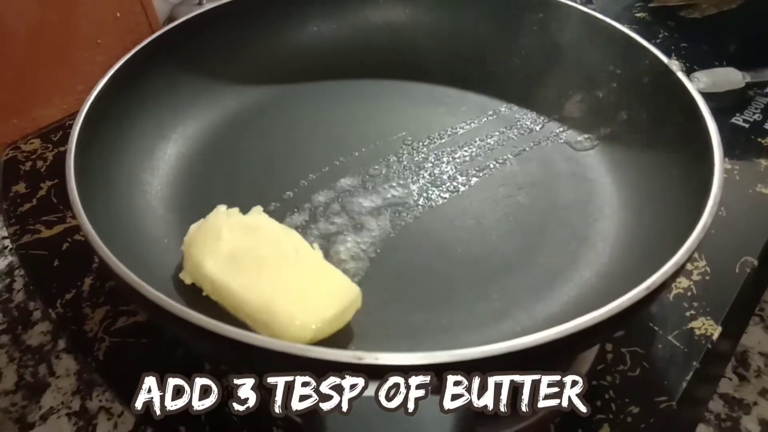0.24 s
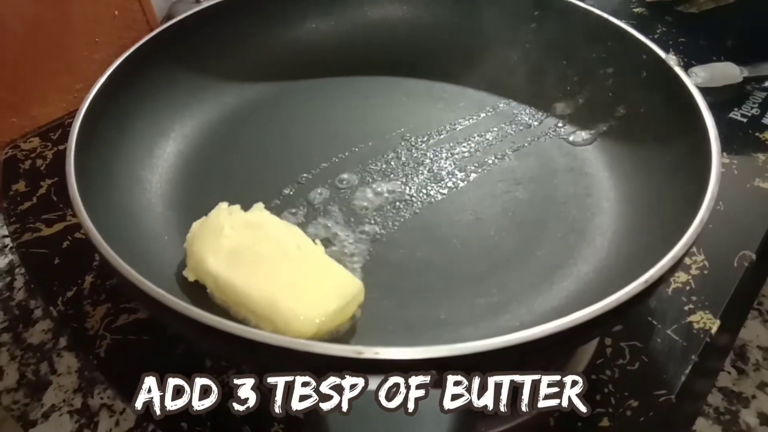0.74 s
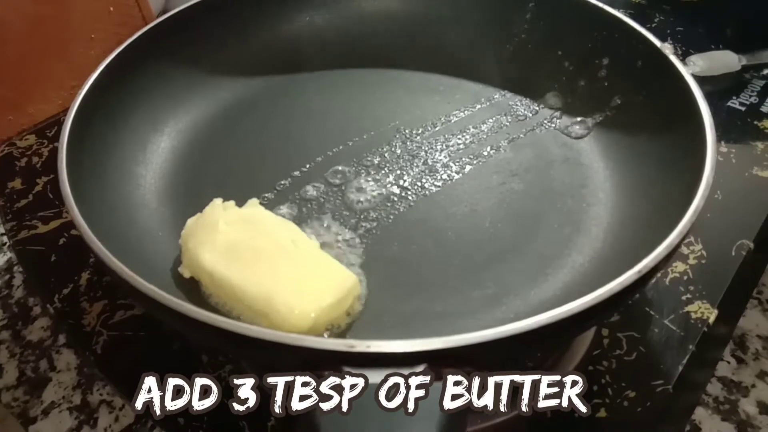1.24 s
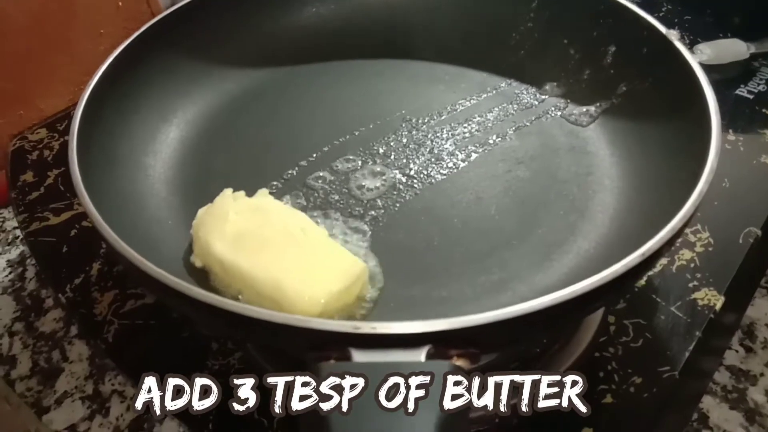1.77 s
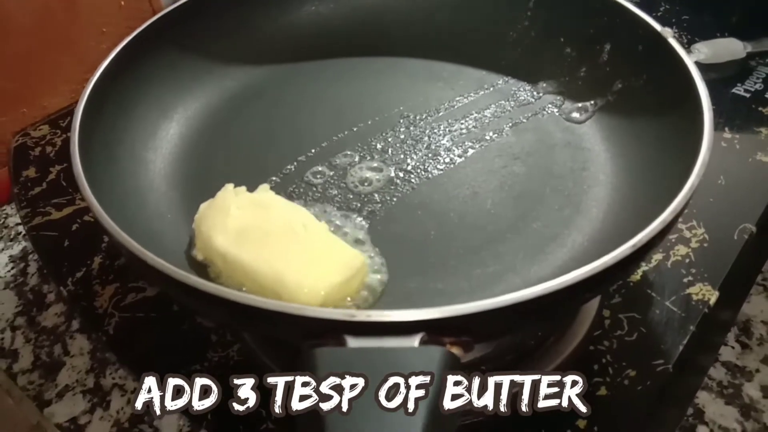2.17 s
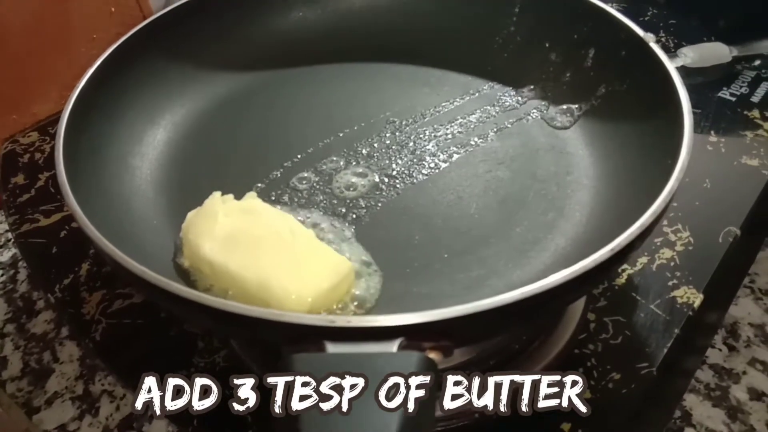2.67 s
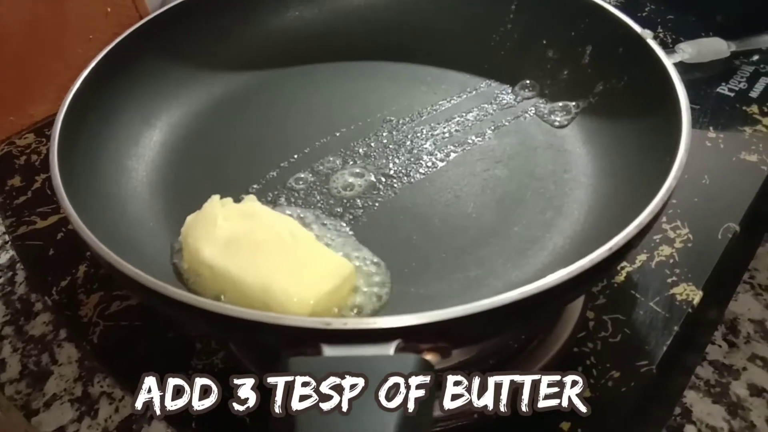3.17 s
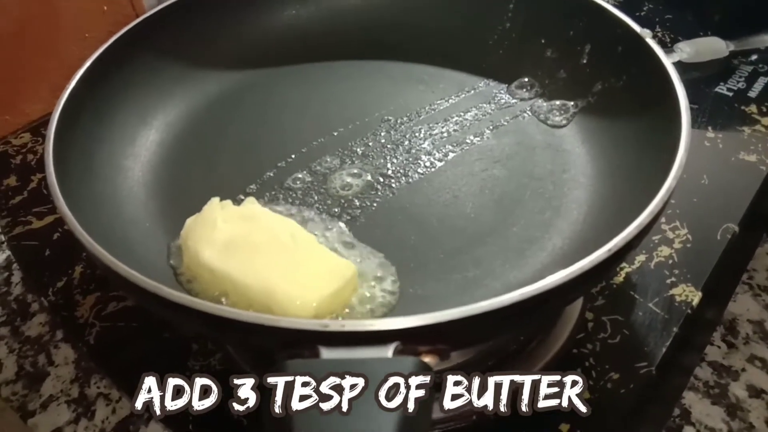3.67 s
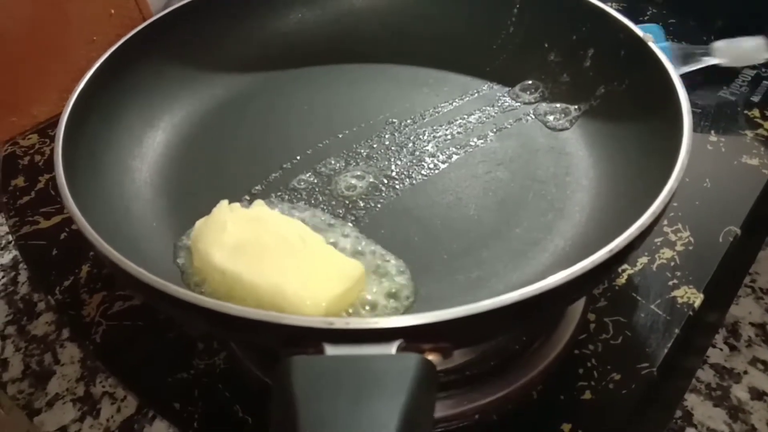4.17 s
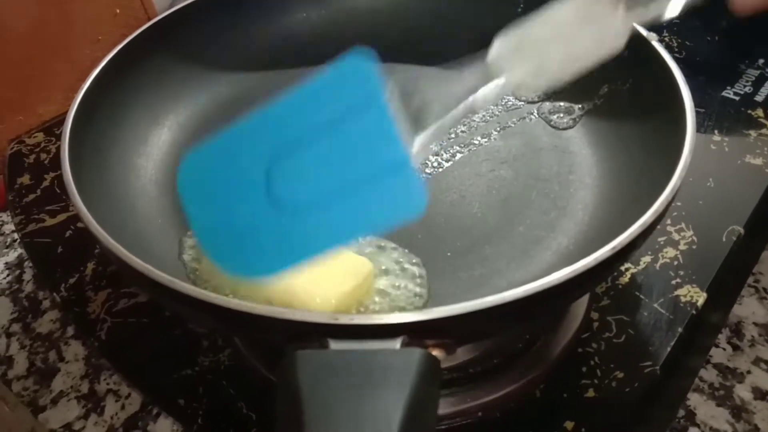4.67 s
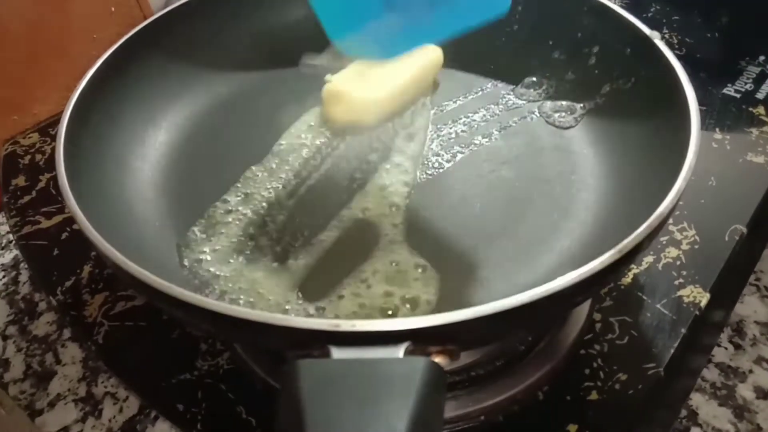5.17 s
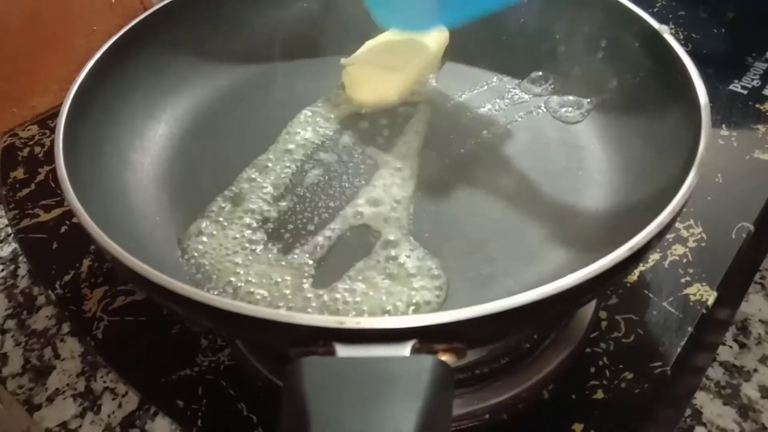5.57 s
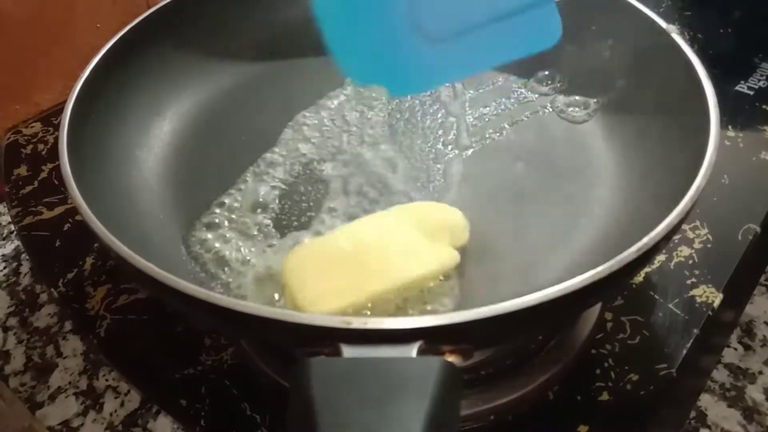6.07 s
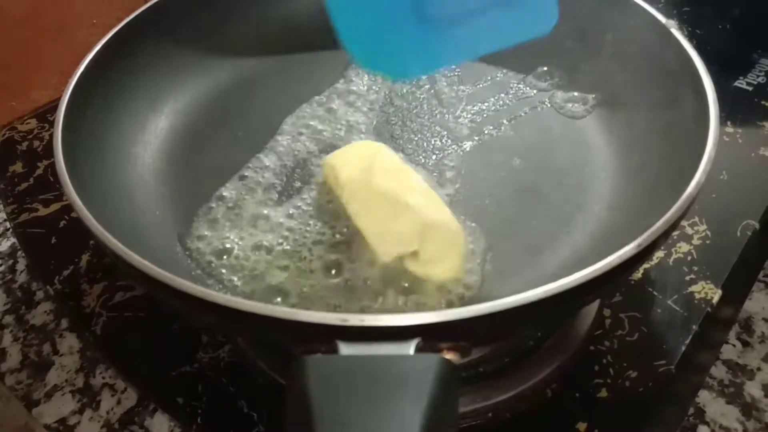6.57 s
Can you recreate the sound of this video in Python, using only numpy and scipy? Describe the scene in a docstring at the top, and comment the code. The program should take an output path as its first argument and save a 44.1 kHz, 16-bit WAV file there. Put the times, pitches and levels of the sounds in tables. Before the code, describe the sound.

Heard close up and in mono in a small kitchen, butter foams in a hot pan: a high hiss of countless tiny bursting bubbles, dotted with sharp pops and little squirts of steam. It flutters at first, then steadies. About two thirds through, a rubber spatula moves the butter and the frying surges and stays louder to the end. The pan rings faintly, and dull bumps and a gas flame sit far below.

```python
"""A bright, crackling sizzle: a knob of butter melts in a hot pan in a small kitchen, close, in mono.
Thousands of tiny steam bubbles burst each second and keep the pan ringing faintly. Single drops spit,
blisters squirt and steam spurts from under the knob. Near 4.8 s a soft spatula pushes the butter over
fresh hot metal and the sizzle grows louder, denser and fuller. Below it, dull bumps and a gas ring."""
import sys
import numpy as np
from scipy import signal
from scipy.fft import rfft, irfft
from scipy.io import wavfile
from scipy.ndimage import uniform_filter1d

SR = 44100
rng = np.random.default_rng(int(sys.argv[2]) if len(sys.argv) > 2 else 0)


def bounce(signal):
    """Save signal as a 16-bit WAV file at the path given by the first command-line argument."""
    frames = np.transpose(np.atleast_2d(signal))
    limited = np.clip(frames, -1, 1)
    pcm = np.round(limited * 32767).astype(np.int16)
    wavfile.write(sys.argv[1], SR, pcm)


N = 301203
TIME_S = np.arange(N) / SR
SIMMER_DB = -28   # frying level at zero vigour

# Loudest spitting drops. Each row: start in seconds, dry peak in dB.
LOUD_SPITS = [(0.2733, -14), (0.4509, -12), (0.5207, -12), (0.595, -13), (1.1802, -12), (1.2396, -11),
              (1.289, -13), (1.3658, -12), (1.7335, -13), (2.0672, -11), (2.9267, -13), (3.2226, -11),
              (3.8636, -9), (4.1904, -9), (4.8244, -11), (5.2969, -8), (5.7608, -8), (6.2377, -9)]
# Modes of the pan. Each row: frequency in Hz, bandwidth in Hz, relative gain in dB.
PAN_MODES = [(580, 47, -18), (824, 34, -6.5), (1263.5, 48, 4), (1714, 30, 0.5), (1917, 16, -1),
             (2148, 140, 3), (2500, 20, 0.5), (2885, 50, 8.5), (3190, 87, 7), (3750, 75, 4)]


def bubble_bursts(clump_db=1.5, clumps_per_s=35, ring_width_hz=350, tear_s=0.0086, fizz_s=0.047):
    """Bubbles burst in clumps; each snaps, rings at its own pitch, tears and fizzes out. Even level."""
    # Spreading foam. Each row: time in seconds, nominal bursts per second, size spread in dB.
    foam = [(0, 2560, 0), (1.3, 3600, 1), (2.4, 4600, 2), (4.7, 4700, 0), (5.0, 8000, 0.5),
            (6.83, 12200, 0.5)]
    per_s, spread_db = curves(foam)
    born = rng.random(N) < per_s * from_db(clump_db * drift(clumps_per_s)) / SR
    impulses = born * rng.choice([-1, 1], N)
    clicks = impulses * from_db(spread_db * np.minimum(rng.exponential(1, N), 5.9))
    pitches_hz = np.linspace(1000, 12000, 28)
    pitch_index = rng.integers(0, len(pitches_hz), N)
    rings = sum(resonate(clicks * (pitch_index == k), hz, ring_width_hz) * rng.choice([-1, 1])
                for k, hz in enumerate(pitches_hz))
    snaps = from_db(-3) * rms_one(clicks) * rng.choice([-1, 1], N)
    tears = from_db(-5) * fizz(clicks, tear_s)
    crackle = rms_one(rings) + snaps + tears + from_db(-6) * fizz(clicks, fizz_s)
    return crackle / np.sqrt(uniform_filter1d(crackle ** 2, size=SR // 12) + 1e-12)


def fizz(clicks, decay_s):
    """Each click leaves a decaying puff of noise."""
    pole = np.exp(-2 / (decay_s * SR))
    power = signal.lfilter([1], [1, -pole], clicks ** 2)
    return rms_one(np.sqrt(power) * rng.standard_normal(N))


def sizzle(crackle, squeeze_lag_s=0.035):
    """Coarse bubbles below the main hiss, fine spray above it; all three follow the vigour."""
    # Lean of the hiss. Each row: time in seconds, boost above and cut below 7 kHz in dB.
    lean = [(0, 3), (0.7, 3), (1.3, 0.5), (2.4, 0), (4.7, -2), (5.0, -1.5), (6.83, 0)]
    lean_db, = curves(lean)
    vigour_db, stutter_db, smother_db = vigour(), stutter(), spatula_pressure(lag_s=0)
    coarse, rest = split(brighten(crackle), hz=4556)
    hiss, spray = split(rest, hz=9000)
    lower, upper = split(hiss, hz=7000)
    hiss = from_db(-lean_db) * lower + from_db(lean_db) * upper
    hiss_db = SIMMER_DB - 1.01 + vigour_db + stutter_db - smother_db
    coarse_db = -47.5 + 1.274 * vigour_db + 0.66 * stutter_db + 1.32 * drift(per_s=30)
    coarse_db += 1.9 * spatula_pressure(squeeze_lag_s)   # a press squeezes out coarse bubbles
    spray_db = -38.5 + 1.21 * vigour_db + 0.39 * stutter_db + flash() - smother_db
    bands = (coarse_db, coarse), (hiss_db, hiss), (spray_db, spray)
    return sum(from_db(db) * rms_one(band) for db, band in bands)


def brighten(x):
    """Tone of a burst: strongest at 6-7 kHz, with the microphone's thin sheen on top."""
    # Both spectra, each row: frequency in Hz, gain in dB.
    burst_spectrum = [(500, -44), (1050, -40.5), (1900, -35), (2300, -25), (3000, -17), (3450, -23),
                      (4200, -20), (5300, -8), (6000, 0.5), (6650, -4.5), (7200, 0.5), (8150, -10.5),
                      (8700, -12), (10000, -22)]
    sheen_spectrum = [(10000, -1), (13850, -1.5), (14650, 13)]
    return colour(colour(x, burst_spectrum), sheen_spectrum)


def vigour():
    """Frying level in dB over a simmer; surges as the butter is pushed over fresh metal."""
    # Each row: time in seconds, frying level in dB.
    frying = [(0, -29.5), (0.5, -28.0), (1.0, -29.5), (1.6, -28.5), (2.25, -27.5), (3.0, -28.0),
              (3.3, -26.5), (4.35, -26.5), (4.68, -26.5), (4.77, -26.5), (4.93, -22), (5.35, -21.5),
              (5.7, -22), (6.0, -21.5), (6.15, -22), (6.5, -22), (6.83, -21)]
    return curves(frying)[0] - SIMMER_DB


def stutter(simmer_flutter_db=0.9, halving_db=8, flurry_db=2.5):
    """Quick swings of the hiss in dB: sparse foam flutters, loud spits set off flurries, lulls dip."""
    flutter_db = simmer_flutter_db * 0.5 ** (vigour() / halving_db) * drift(per_s=40)
    flurries = sum(swell(s, rise_s=0.002, fall_s=0.018) for s, _ in LOUD_SPITS)
    return flutter_db + flurry_db * flurries - lulls()


def lulls():
    """Hiss lost, in dB, as the still thin foam falters."""
    # Each row: centre in seconds, depth in dB.
    dips = [(0.21, 2.5), (0.72, 3), (0.98, 2.5), (1.12, 4.5), (1.27, 6.5), (1.38, 4), (1.71, 2.5),
            (2.04, 1)]
    return sum(db * hump(s, half_s=0.037) for s, db in dips)


def flash():
    """Extra spray in dB: fat meets bare hot metal and flashes until its water boils off."""
    # Each row: crest in seconds, boost in dB, rise and fall in seconds.
    flashes = [(0.2, 6, 0.6, 1), (2.08, 8, 0.016, 0.05), (2.29, 5, 0.031, 0.038), (5.01, 6, 0.17, 0.083),
               (5.86, 4, 0.24, 0.52)]
    return sum(db * swell(s, rise_s, fall_s) for s, db, rise_s, fall_s in flashes)


def spits(tear_s=0.0021, tear_db=-20):
    """A drop bursts with one sharp snap and a brief tearing of its film."""
    drops = list(LOUD_SPITS) + small_spits()
    starts = [int(s * SR) for s, _ in drops]
    t, out = TIME_S[:SR // 100], np.zeros(N)
    tears = rng.standard_normal((len(drops), len(t))) * np.exp(-t / tear_s) * from_db(tear_db)
    for at, tear in zip(starts, tears):
        out[at:at + len(t)] += (t == 0) + tear
    out = brighten(resonate(out, hz=6730, width_hz=1300))   # the drop's cavity rounds the snap
    for at, (_, peak_db) in zip(starts, drops):
        snap = out[at:at + SR // 200]
        snap *= from_db(peak_db) / np.abs(snap).max()
    return out


def small_spits(per_s=6, over_frying_db=11, spread_db=1.5):
    """Lesser drops spit at random, following the frying. Each row: start in seconds, dry peak in dB."""
    starts = np.flatnonzero(rng.random(N - SR // 50) < per_s / SR)
    peak_db = SIMMER_DB + vigour() - lulls() + over_frying_db + spread_db * rng.uniform(-1.2, 1, N)
    return list(zip(starts / SR, peak_db[starts]))


def squirts(width_hz=850, rise_s=0.0041):
    """Steam is forced through the torn skin of a blister, which resonates."""
    # Each row: crest in seconds, level in dB, fall in seconds, centre in Hz.
    blisters = [(0.13, -41, 0.0087, 4200), (0.472, -32, 0.0068, 4780), (0.595, -47, 0.013, 4130),
                (1.06, -47, 0.01, 4960), (1.86, -36, 0.0098, 4870), (3.15, -32, 0.014, 5000),
                (4.06, -34, 0.021, 4800)]
    jet = rng.standard_normal(N)
    return sum(from_db(db) * swell(s, rise_s, fall_s) * steep_band(jet, hz, width_hz)
               for s, db, fall_s, hz in blisters)


def spurts(width_hz=1500, sputter_db=1.5, ring_db=-5, trim_db=-3):
    """Trapped steam escapes in short, dull, sputtering puffs that ring the pan."""
    # Each row: crest in seconds, level before trim in dB, rise and fall in seconds, centre in Hz.
    puffs = [(0.085, -48.5, 0.0096, 0.028, 1500), (0.342, -47, 0.0081, 0.026, 1490),
             (0.752, -44, 0.016, 0.018, 1450), (0.89, -46, 0.0094, 0.008, 1600),
             (1.441, -44, 0.0084, 0.047, 990), (1.683, -39, 0.021, 0.013, 1350),
             (2.072, -38, 0.0052, 0.025, 2320), (2.138, -37.5, 0.018, 0.012, 1590),
             (2.279, -36.5, 0.026, 0.041, 1640), (3.98, -47, 0.012, 0.014, 900)]
    # Each row: frequency in Hz, gain in dB.
    jet_spectrum = [(120, 0), (350, -1.5), (600, 1.5), (1050, -6), (1350, -1), (2000, -4), (2800, 0),
                    (4500, -38), (9000, -78)]
    sputter = rng.standard_normal(N) * from_db(sputter_db * drift(per_s=250))
    jet = rms_one(colour(sputter, jet_spectrum))
    ring = sum(from_db(db) * resonate(jet, hz, mode_width_hz) for hz, mode_width_hz, db in PAN_MODES)
    jet += from_db(ring_db) * rms_one(ring)
    return sum(from_db(db + trim_db) * swell(s, rise_s, fall_s) * rms_one(resonate(jet, hz, width_hz))
               for s, db, rise_s, fall_s, hz in puffs)


def pan_ring(flicker_db=1.9):
    """Bubbles collapsing on the metal keep its modes ringing, more so as the frying grows."""
    level_db = -58.5 + 1.51 * vigour() + flash()
    ring = np.zeros(N)
    for hz, width_hz, db in PAN_MODES:
        gain = from_db(db + flicker_db * drift(per_s=25))
        ring += gain * resonate(rng.standard_normal(N), hz, width_hz)
    return from_db(level_db) * rms_one(ring)


def spatula_rubs(relative_width=0.041):
    """Rubber and butter are soft: each nudge is a dull, narrow murmur of the pan."""
    # Each row: crest in seconds, level in dB, rise and fall in seconds, centre in Hz.
    nudges = [(4.85, -58.5, 0.049, 0.04, 738), (4.94, -48.5, 0.061, 0.045, 1270),
              (5.62, -61, 0.024, .03, 292)]
    rub = rng.standard_normal(N)
    return sum(from_db(db) * swell(s, rise_s, fall_s) * rms_one(resonate(rub, hz, relative_width * hz))
               for s, db, rise_s, fall_s, hz in nudges)


def spatula_pressure(lag_s):
    """How hard the spatula bore down lag_s earlier, in dB of hiss smothered."""
    # Each row: centre in seconds, hiss lost in dB, half length in seconds.
    presses = [(4.772, 3.5, 0.067), (5.63, 1.4, 0.046), (6.164, 1.5, 0.1)]
    return sum(db * hump(s + lag_s, half_s) for s, db, half_s in presses)


def bumps():
    """Brief, soft booms, all on one low resonance."""
    # Each row: crest in seconds, level in dB.
    crests = [(0.71, -64), (0.9, -58), (3.29, -54.5), (5.2, -55), (5.62, -58), (5.91, -54), (6.33, -57.5)]
    boom = steep_band(rng.standard_normal(N), hz=92, width_hz=44)
    return boom * sum(from_db(db) * hump(s, half_s=0.029) for s, db in crests)


def burner(flame_db=-67, waver_db=2, air_db=-70):
    """The gas ring rumbles unevenly over the still air of the kitchen."""
    # Both spectra, each row: frequency in Hz, gain in dB.
    flame_spectrum = [(20, -25), (55, -14), (76, 1.5), (100, 4.5), (135, -10), (205, -5.5), (320, -18.5),
                      (700, -62)]
    air_spectrum = [(20, 13), (60, -10), (180, 7.5), (300, 8), (500, 5), (1000, -15.5), (3000, -52),
                    (12000, -5.5)]
    flame, air = rng.standard_normal((2, N))
    rumble = from_db(flame_db + waver_db * drift(per_s=6.9)) * rms_one(colour(flame, flame_spectrum))
    return rumble + from_db(air_db) * rms_one(colour(air, air_spectrum))


def kitchen(x, wet_db, t60_s=0.19):
    """Adds the room's short diffuse tail."""
    t = TIME_S[:SR // 2]
    tail = rng.standard_normal(len(t)) * from_db(-60 * t / t60_s) * (t > 0.005)
    return x + from_db(wet_db) * signal.fftconvolve(x, tail / np.linalg.norm(tail))[:N]


def from_db(db):
    return 10 ** (np.asarray(db) / 20)


def rms_one(x):
    return x / np.sqrt(np.mean(x ** 2) + 1e-20)


def curves(rows):
    """Each value column of a timed table at every sample."""
    times_s, *columns = np.transpose(rows)
    return [np.interp(TIME_S, times_s, column) for column in columns]


def drift(per_s):
    """Smooth random wander, RMS 1."""
    knots = rng.standard_normal(N // 40)
    return rms_one(np.interp(TIME_S * per_s, np.arange(len(knots)), knots))


def swell(crest_s, rise_s, fall_s):
    """Exponential rise to 1 and decay; rise_s and fall_s are time constants."""
    return np.exp(-np.maximum((crest_s - TIME_S) / rise_s, (TIME_S - crest_s) / fall_s))


def hump(centre_s, half_s):
    """Gaussian envelope, peak 1."""
    return np.exp(-((TIME_S - centre_s) / half_s) ** 2)


def resonate(x, hz, width_hz):
    """Two-pole resonance, peak gain 1."""
    r = np.exp(-np.pi * width_hz / SR)
    feedback = [1, -2 * r * np.cos(2 * np.pi * hz / SR), r * r]
    return signal.lfilter(np.array([1, 0, -1]) * (1 - r * r) / 2, feedback, x + 1e-18)


def steep_band(x, hz, width_hz):
    """Two equal resonances in series, output RMS 1."""
    return rms_one(resonate(resonate(x, hz, width_hz), hz, width_hz))


def colour(x, spectrum, size=8192):
    """Minimum-phase filter with the given spectrum."""
    hz, db = np.transpose(spectrum)
    bins_hz = np.maximum(np.fft.rfftfreq(size, 1 / SR), 1)
    gain = from_db(np.interp(np.log(bins_hz), np.log(hz), db))
    cepstrum = irfft(np.log(gain))
    cepstrum[1:size // 2] *= 2
    cepstrum[size // 2 + 1:] = 0
    return signal.fftconvolve(x, irfft(np.exp(rfft(cepstrum))))[:N]


def split(x, hz):
    """The parts below and above hz."""
    low = signal.sosfiltfilt(signal.butter(N=5, Wn=hz, fs=SR, output="sos"), x)
    return low, x - low


def scene():
    """Frying close by, burner beneath; both channels the same."""
    foam = sizzle(kitchen(bubble_bursts(), wet_db=-11))
    frying = foam + kitchen(spits() + spurts() + squirts(), wet_db=-2.5)
    return np.tile(frying + pan_ring() + spatula_rubs() + burner() + bumps(), (2, 1))


def record(dry):
    """Steep low-pass at 15.5 kHz."""
    return signal.sosfilt(signal.ellip(12, 0.1, 90, 15500, fs=SR, output="sos"), dry)


dry = scene()
out = record(dry)
bounce(out)
```